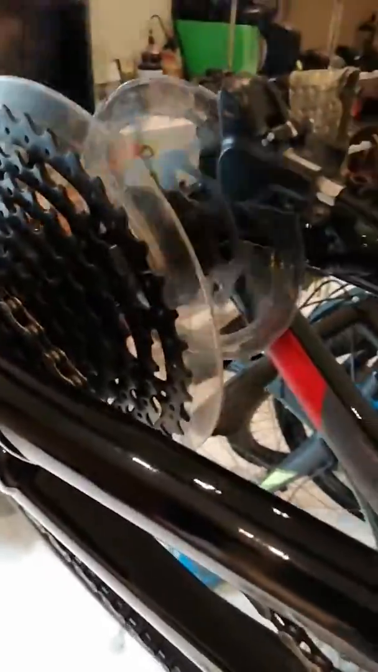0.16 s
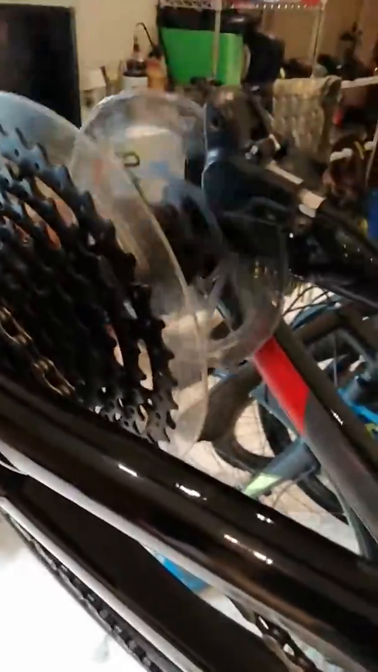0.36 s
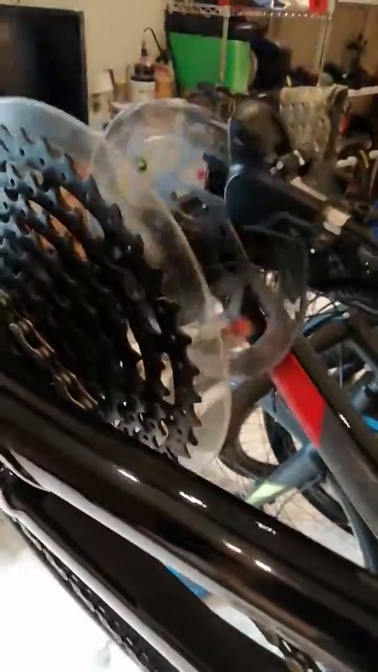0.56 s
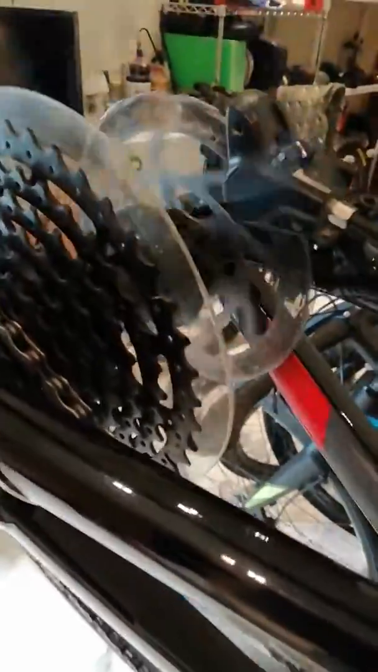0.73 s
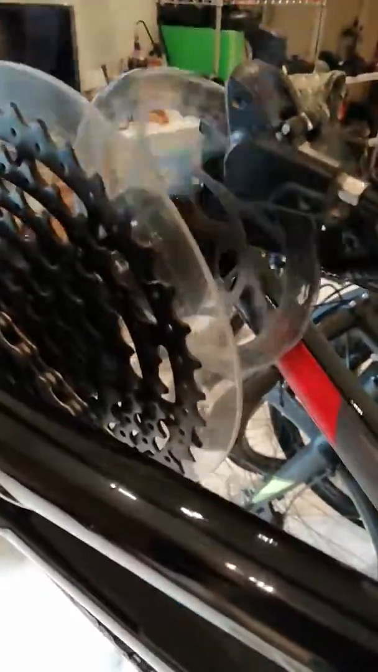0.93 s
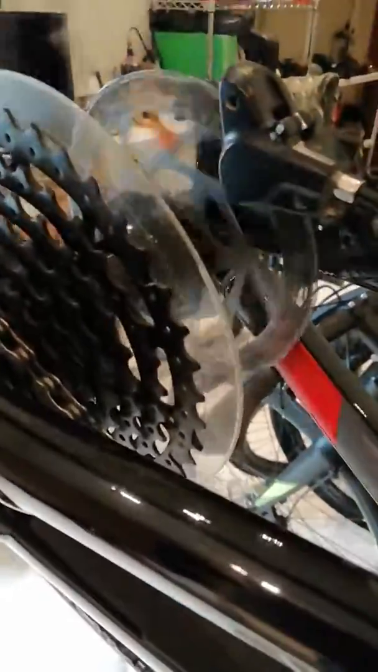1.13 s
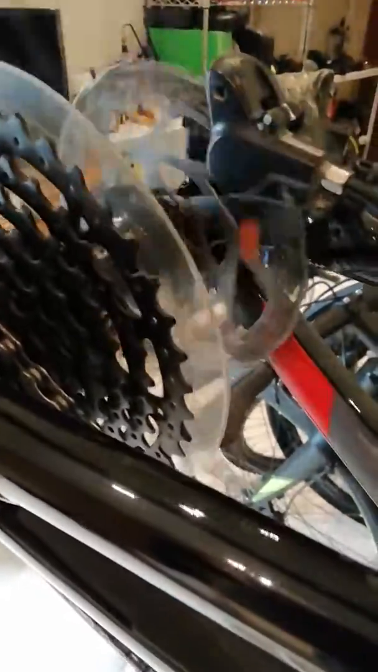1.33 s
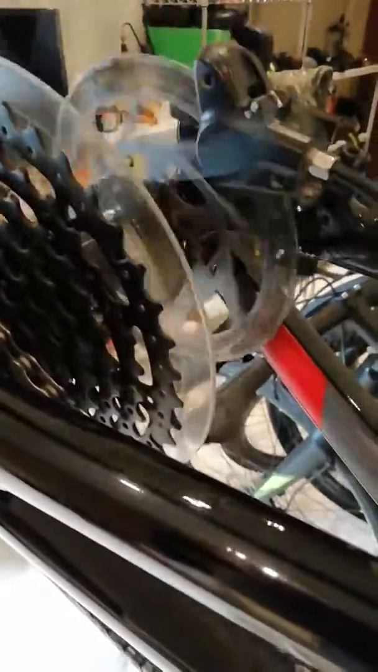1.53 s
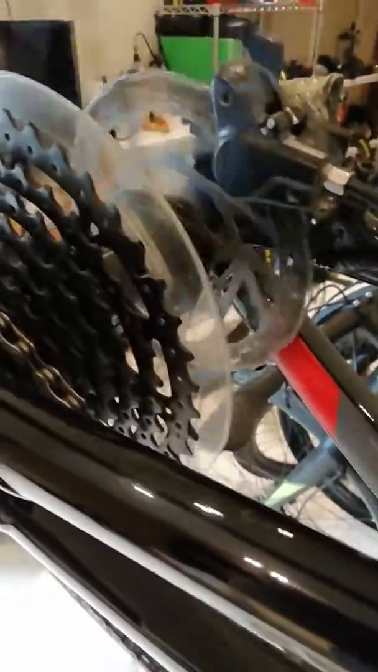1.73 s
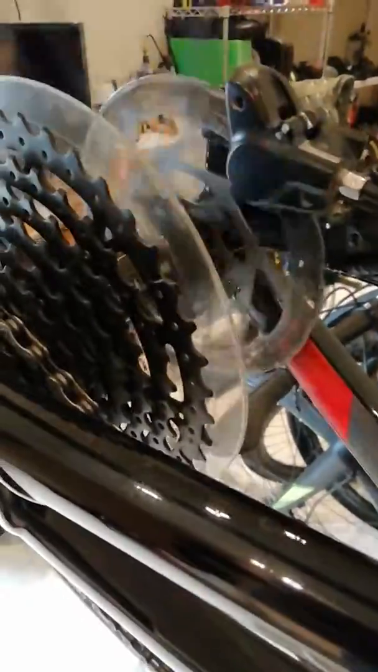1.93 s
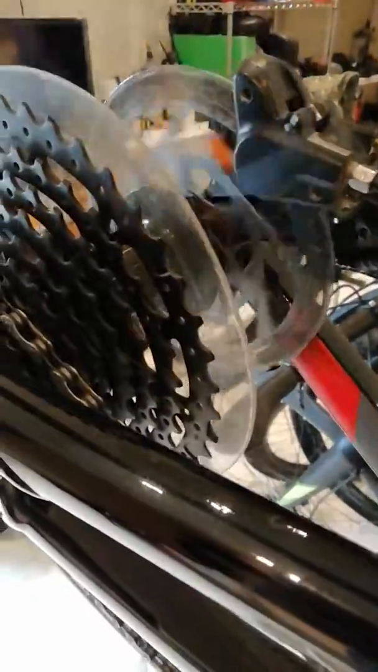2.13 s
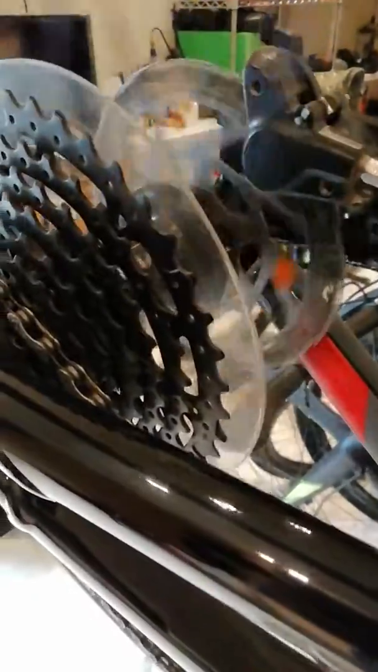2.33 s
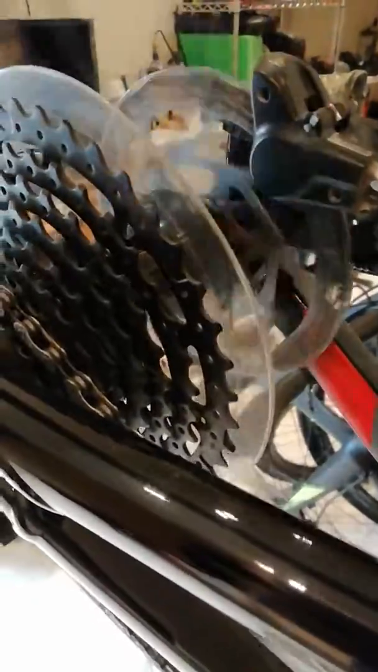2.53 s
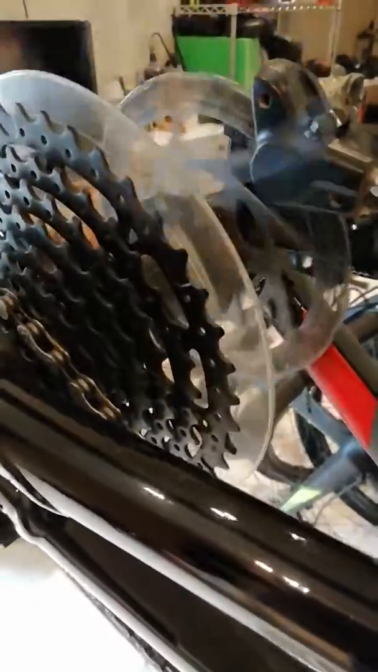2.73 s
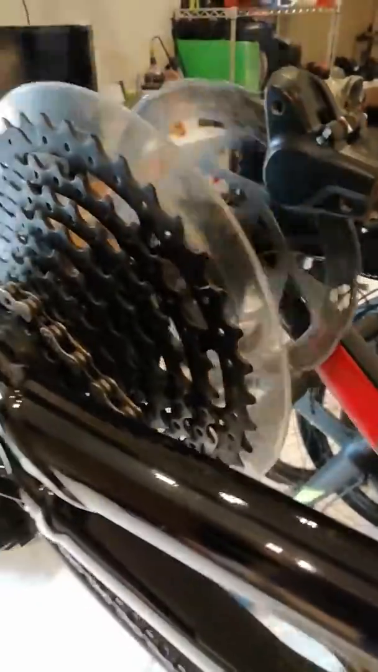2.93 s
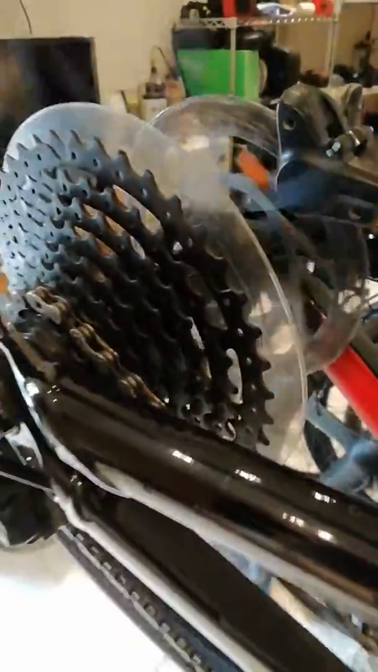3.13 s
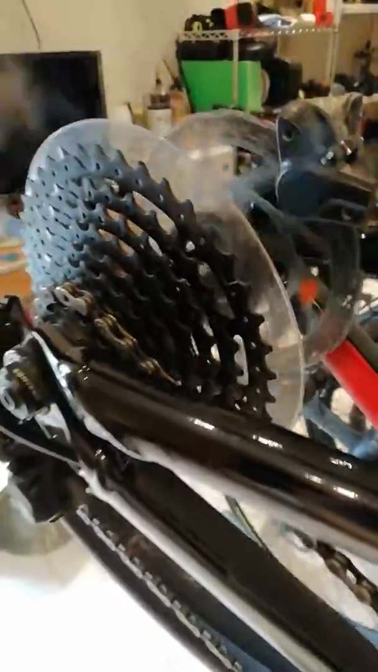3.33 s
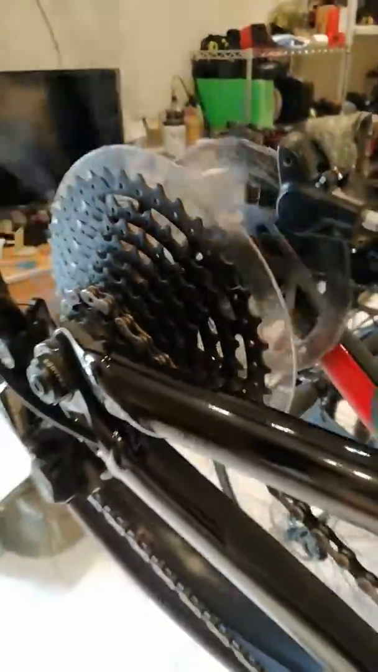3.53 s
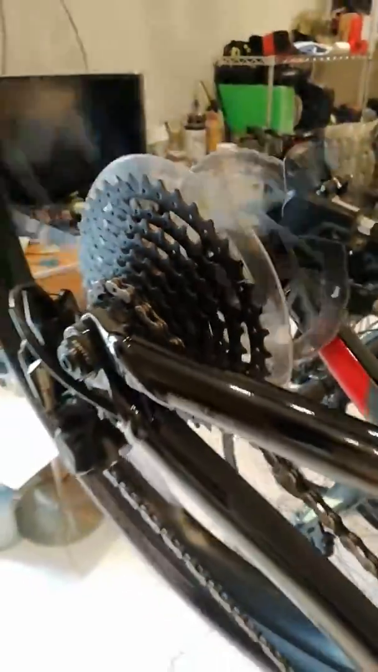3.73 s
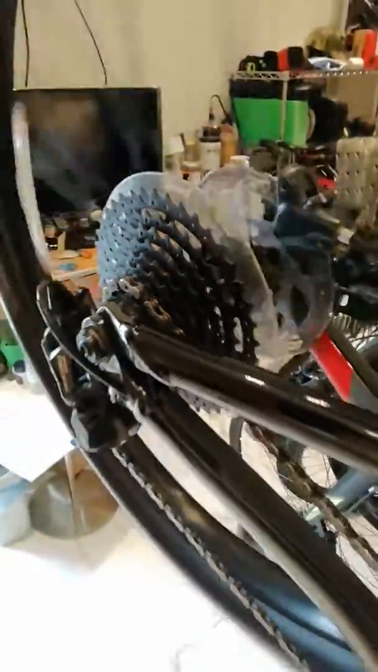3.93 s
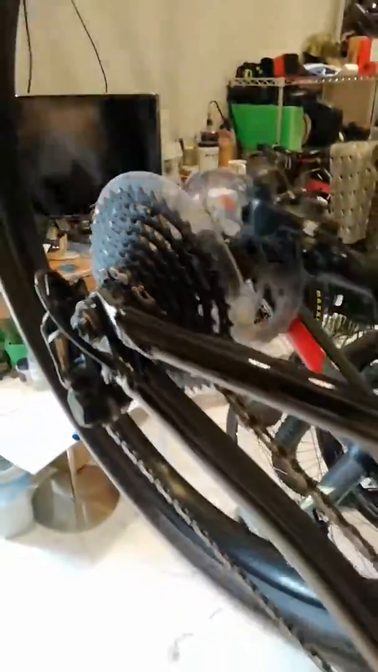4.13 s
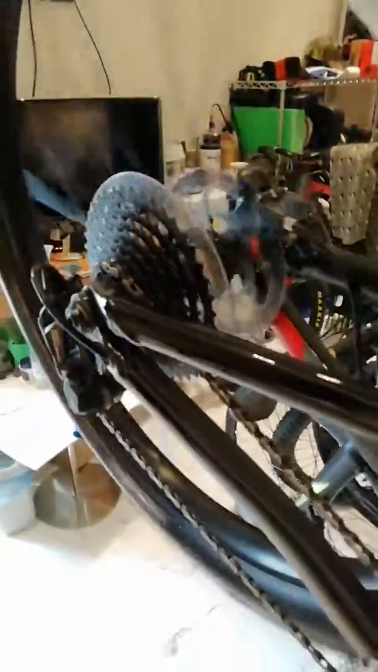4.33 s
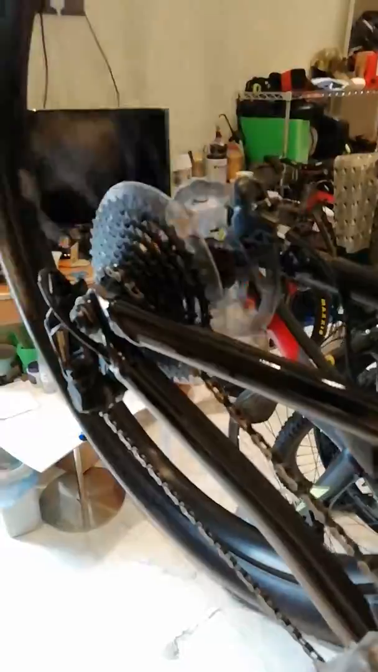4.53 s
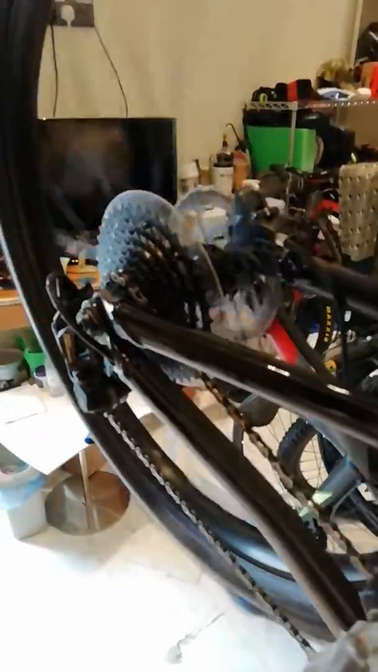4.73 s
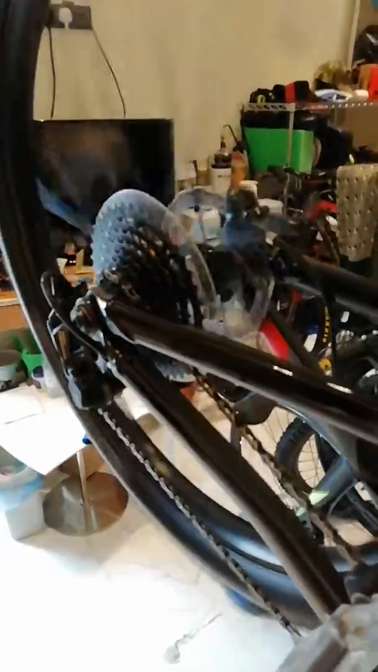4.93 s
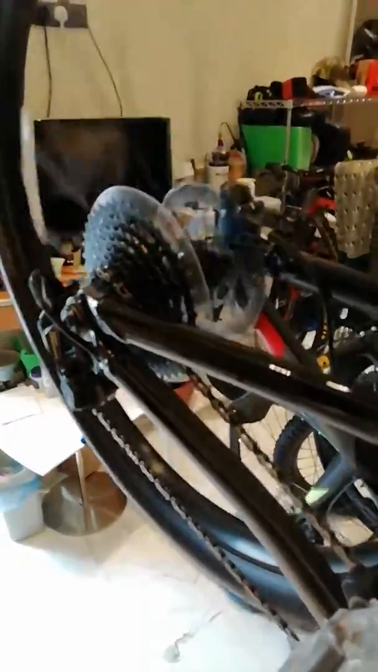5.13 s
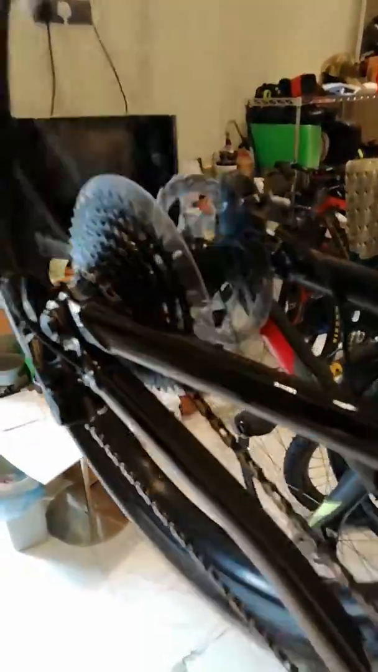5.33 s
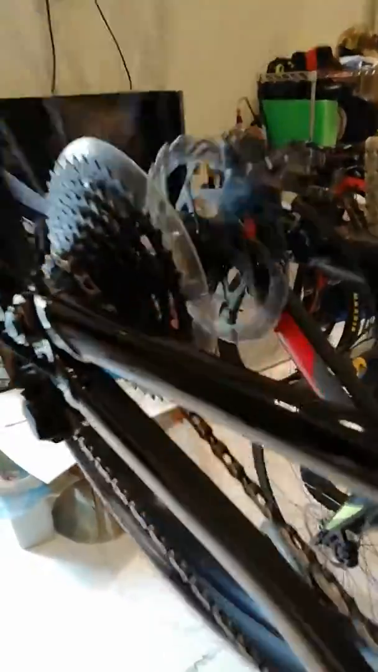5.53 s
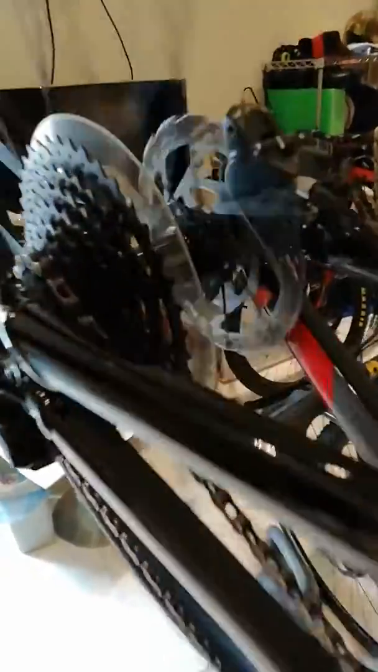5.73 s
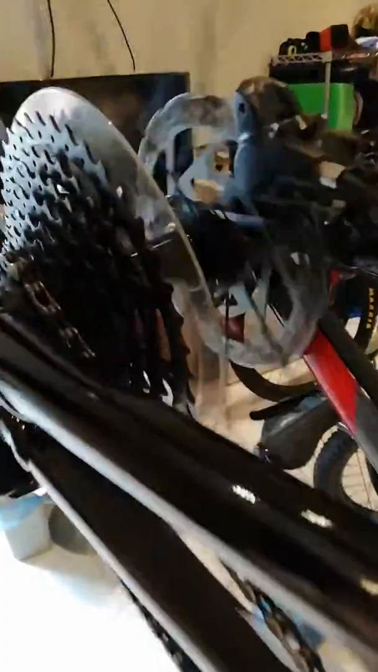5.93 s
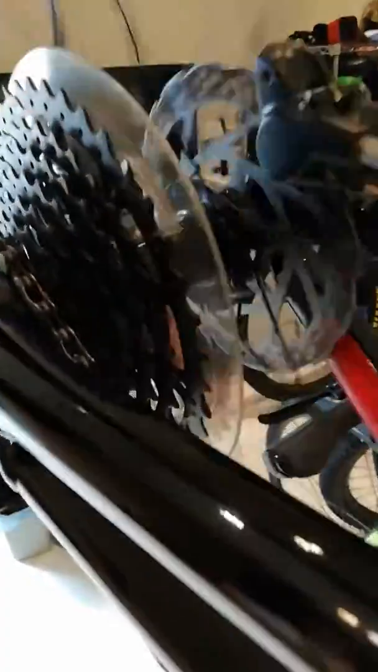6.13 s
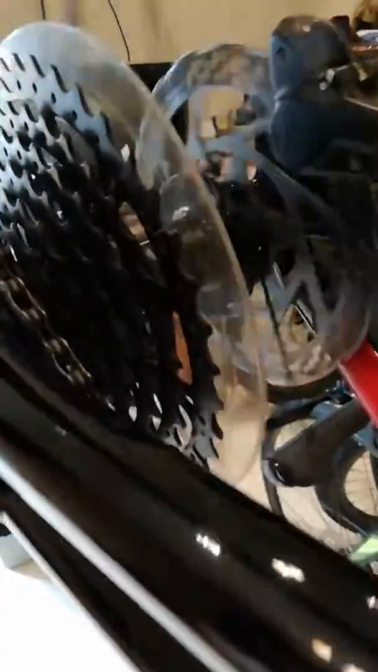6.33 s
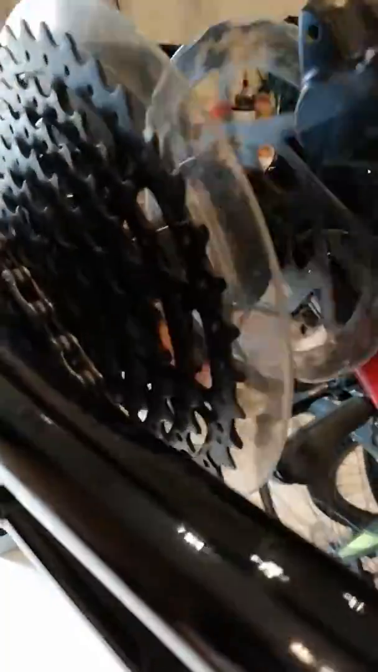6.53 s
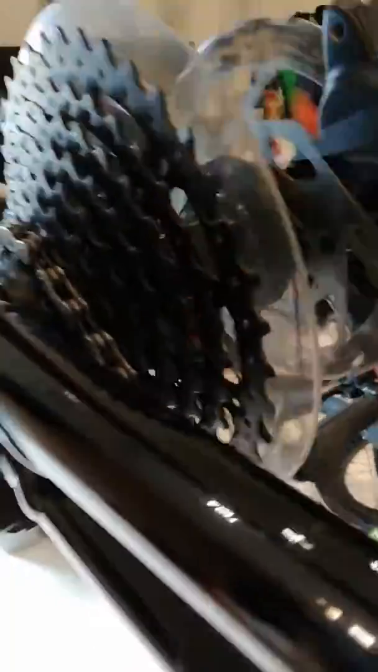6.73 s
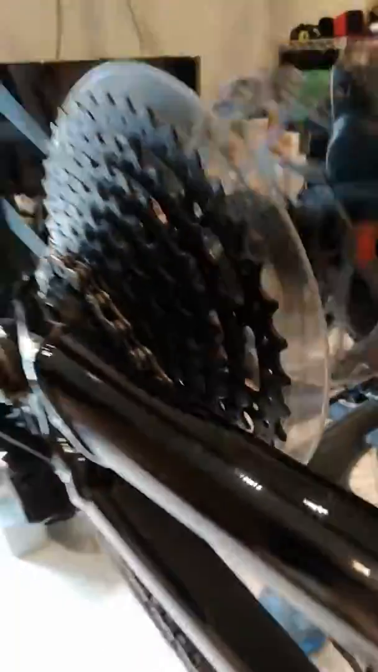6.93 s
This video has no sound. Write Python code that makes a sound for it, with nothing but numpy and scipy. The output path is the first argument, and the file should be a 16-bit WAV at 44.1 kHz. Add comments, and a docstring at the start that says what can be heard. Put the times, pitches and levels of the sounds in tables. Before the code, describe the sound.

Close to the hub of a coasting bicycle wheel, rapid ratchet clicks run together into a high metallic buzz, with a sharper snap about once a second. Midway the microphone moves away and the sound turns quieter and roomier. Near the end it returns, and the clicks are louder again but slower. The place is a small workshop with a faint background hum.

```python
"""In a small, faintly humming workshop, the microphone is close by the sprockets of a bicycle rear wheel
coasting down on a stand, slightly unbalanced. From the start three pawls drop in turn over the 32 ratchet
teeth, and hub, sprockets, spokes and brake disc ring along. Every fourth tooth rings out; from 0.2 s on,
once a turn, a pawl snaps in early. After 3 s the microphone draws back and the room stands out more.
Around 6 s it returns, nearer the disc, while the wheel ticks on more slowly."""
import sys
import numpy as np
from scipy import signal
from scipy.fft import rfft, irfft, next_fast_len
from scipy.io import wavfile
from scipy.ndimage import uniform_filter1d, minimum_filter1d

SR = 44100
rng = np.random.default_rng(int(sys.argv[2]) if len(sys.argv) > 2 else 0)


def wav_record(signal):
    """Record a signal, one row per channel, as 16-bit PCM in the file named by sys.argv[1]."""
    frames = np.transpose(np.atleast_2d(signal))
    bounded = np.clip(frames, -1, 1)
    # unit amplitude maps onto the largest positive 16-bit level
    quanta = np.round(bounded * 32767).astype(np.int16)
    wavfile.write(sys.argv[1], SR, quanta)


N = 307366
TIME = np.arange(N) / SR
AGE = np.arange(SR // 25) / SR  # time within one click [s]
TEETH_COUNT, WORN_TOOTH = 32, 9


def from_db(db):
    """Decibels to gain."""
    return 10 ** (np.asarray(db) / 20)


def unit_rms(x):
    """Scale to unit power."""
    return x / np.sqrt(np.mean(x ** 2) + 1e-20)


def hold_level(x):
    """Hold the power at 1 over a few teeth."""
    return x / np.sqrt(uniform_filter1d(np.mean(x ** 2, axis=0), size=SR // 8) + 1e-9)


def curve_at(rows, times):
    """The columns of a curve at the given times."""
    knots, *columns = np.transpose(rows)
    return [np.interp(times, knots, column) for column in columns]


def butter(x, order, hz, kind):
    """Causal Butterworth filter."""
    return signal.sosfilt(signal.butter(order, hz, kind, fs=SR, output="sos"), x)


def colour(x, points, keep_power=True):
    """Minimum-phase filter that follows a table of (frequency [Hz], gain [dB])."""
    size = 2 * next_fast_len(x.shape[-1] // 2 + SR // 20)
    hz, db = np.transpose(points)
    bins_hz = np.arange(size // 2 + 1) * SR / size
    gain = from_db(np.interp(np.log(bins_hz + 1), np.log(hz), db))
    cepstrum = irfft(np.log(unit_rms(gain) if keep_power else gain))[:size // 2]
    cepstrum[1:] *= 2
    return irfft(rfft(x, size) * np.exp(rfft(cepstrum, size)))[..., :x.shape[-1]]


def place(times, sounds):
    """Lay short stereo sounds (events, 2, samples) on the time line."""
    out = np.zeros((2, N + len(AGE)))
    for at, sound in zip(np.round(times * SR).astype(int), sounds):
        if 0 < at < N:
            out[:, at:at + len(AGE)] += sound
    return out[:, :N]


def resonate(x, modes, sign=1, lobe_s=0.97, order=1):
    """Modes beam, so each swells or dips as the microphone passes its lobe; the sum has unit power."""
    out = 0
    for k, (hz, width_hz, db, passing_s, lobe_db) in enumerate(modes):
        radius = np.exp(-np.pi * abs(width_hz) / SR)
        section = [0.95, 0.014, -0.97, 1, -2 * radius * np.cos(2 * np.pi * hz / SR), radius ** 2]
        rung = signal.sosfilt([section] * order, x + 1e-18)  # order 2 softens the onset
        lobe = np.exp(-.5 * ((TIME - passing_s) / lobe_s) ** 2)
        out = out + sign ** k * from_db(db + lobe_db * lobe) * unit_rms(rung)
    return unit_rms(out)


# spectrum of the workshop's background: (frequency [Hz], relative level [dB])
BACKGROUND_SPECTRUM = [(20, -4.5), (50, 2), (130, 3.5), (250, -3), (420, -5), (560, -9), (900, -11.5),
                       (3000, 5), (16000, -43)]
def background(apart_hz=260):
    """Quiet room rumble and hiss, alike at both sides of the microphone in the bass."""
    mid, side = rng.standard_normal((2, N))
    side = butter(side, 1, apart_hz, "high")
    return colour(mid + side * [[1], [-1]], BACKGROUND_SPECTRUM)


# the room's hum at the microphone: (time [s], level [dB])
ROOM_TONE_LEVEL = [(0, -63.5), (2.5, -66), (3.6, -62), (4.4, -59.5), (4.9, -67), (7, -77)]
def room_tone(hz=415):
    """A faint hum of steady pitch, a little later on the left."""
    tone = np.sin(2 * np.pi * hz * TIME - np.array([[1], [0]]))
    return from_db(curve_at(ROOM_TONE_LEVEL, TIME)[0]) * tone


# low wheel modes: (frequency [Hz], width [Hz], relative level [dB], lobe passed at [s], lobe gain [dB])
WHEEL_MODES = [(158, 10, -9, 5.5, 8), (410, 60, -4, 4.3, 0), (716, 14, -2, 5.8, 6), (907, 45, 2, 4.2, 4)]
# their sum at the microphone: (time [s], level [dB])
WHEEL_HUM_LEVEL = [(0, -55.5), (2, -57.5), (4.5, -59), (5.3, -60), (7, -67)]
def wheel_hum():
    """The wheel rings low and faint."""
    ringing = resonate(rng.standard_normal((2, N)), WHEEL_MODES)
    return from_db(curve_at(WHEEL_HUM_LEVEL, TIME)[0]) * ringing


def drops(pawl, start_speed=38.8096, friction=1.18473, drag_per_s=.038878):
    """Times and teeth of a pawl's drops as bearing friction [teeth/s^2] and air drag slow the wheel."""
    friction_speed = friction / drag_per_s
    speed = (start_speed + friction_speed) * np.exp(-drag_per_s * TIME) - friction_speed  # [teeth/s]
    turned = np.cumsum(speed) / SR - .342  # all angles in teeth
    # the heavy spot makes the wheel run ahead, then behind, once a turn, and more so as it slows
    sway = .0346 * (29.5 / speed) ** 2 * np.cos(2 * np.pi * (turned + .54) / TEETH_COUNT)
    lead = [.1261 + .004757 * speed, 0, .0012 * speed - .156][pawl]  # ahead of the second pawl
    angle = turned - sway + lead
    passed = np.arange(int(angle[-1]) + 1)
    if pawl == 1:  # on the worn tooth the second pawl snaps instead
        passed = passed[passed % TEETH_COUNT != WORN_TOOTH]
    tooth = passed % TEETH_COUNT
    worn_lag = .06 * (pawl == 2) * (tooth == WORN_TOOTH)
    return np.interp(passed + worn_lag, angle, TIME), tooth


# the cut repeats every fourth tooth; for a pawl that feels it fully: (click gain [dB], treble gain [dB])
TOOTH_CUT = [(-3, 0), (-0.3, -1), (0.3, 0.5), (1.8, 0)]
def drop_strength(pawl, tooth, swing_db=.13, hardest_tooth=23, wear_db=.34):
    """Force and treble of each drop in dB; both follow the cut, the force also the turn and the wear."""
    swing = swing_db * np.cos(2 * np.pi * (tooth - hardest_tooth) / TEETH_COUNT)
    wear = wear_db * rng.standard_normal(TEETH_COUNT)[tooth]
    feels_cut = [.55, 1, .1][pawl]
    click_db, treble_db = feels_cut * np.array(TOOTH_CUT)[tooth % len(TOOTH_CUT)].T
    return click_db + swing - wear, treble_db


def stereo_noise(count, alike):
    """Short pairs of noise with a given left-right correlation."""
    mid, side = np.moveaxis(rng.standard_normal((count, 2, 1, len(AGE))), 1, 0)
    return (np.sqrt(1 + alike) * mid + np.sqrt(1 - alike) * side * [[1], [-1]]) / np.sqrt(2)


def crack(tooth, rise_s, fall_s, body_db, body_s, cut_share=.55, low_hz=7500, high_hz=10000):
    """Steel on steel: a burst of hub modes, then a weaker ring; a tooth sounds alike on every turn."""
    by_cut = stereo_noise(len(TOOTH_CUT), alike=.45)[tooth % len(TOOTH_CUT)]
    by_tooth = stereo_noise(TEETH_COUNT, alike=.45)[tooth]
    signature = np.sqrt(cut_share) * by_cut + np.sqrt(1 - cut_share) * by_tooth
    repeats = .92 * np.exp(-AGE / .005)
    grain = np.sqrt(repeats) * signature + np.sqrt(1 - repeats) * stereo_noise(len(tooth), alike=.21)
    grain[:, 0] = np.roll(grain[:, 0], round(.00026 * SR), axis=-1)  # later on the left
    envelope = (1 - np.exp(-AGE / rise_s)) * (np.exp(-AGE / fall_s) + from_db(body_db) * np.exp(-AGE / body_s))
    burst = grain * envelope
    # every click starts out equally strong in its bright band
    band_power = np.mean(butter(burst, 2, [low_hz, high_hz], "band") ** 2, axis=2, keepdims=True)
    target_power = np.mean(envelope ** 2) * 2 * (high_hz - low_hz) / SR
    return burst * np.sqrt(target_power / band_power)


# the hub shell's note that beams towards the microphone: (time [s], pitch [Hz])
SHELL_NOTE = [(0.0, 8500), (0.74, 9240), (1.34, 8600), (3.13, 8330), (3.28, 7950), (4.23, 8570),
              (4.29, 8260), (4.54, 9000), (5.16, 8160), (5.26, 9000), (5.3, 8340), (5.82, 8250),
              (6.02, 8820), (6.97, 8400)]
def shell_pitch(pawl, times, shifts_hz=(-100, -50, 550)):
    """Each pawl rings the hub shell a little off its note."""
    return curve_at(SHELL_NOTE, times)[0] + shifts_hz[pawl]


def shell_ring(sounds, hz, width_hz=1300, ring_db=-2):
    """Each click rings on briefly in the hub shell."""
    radius = np.exp(-np.pi * width_hz / SR)
    rung = [signal.lfilter([1, 0, -1], [1, -2 * radius * cosine, radius ** 2], sound)
            for sound, cosine in zip(sounds, np.cos(2 * np.pi * hz / SR))]
    return sounds + from_db(ring_db) * (1 - radius ** 2) / 2 * np.array(rung)


def beam_treble(sounds, treble_db, edge_hz=10500, decay_s=.051, scatter_db=2.5):
    """The top of each click dies first; it beams, and is lost off the axis."""
    highpass = signal.butter(3, edge_hz, "high", fs=SR, output="sos")
    top = signal.sosfiltfilt(highpass, sounds, padtype=None)
    gain = from_db(treble_db + scatter_db * rng.standard_normal(len(sounds)))[:, None, None]
    return sounds + top * (gain * np.exp(-AGE / decay_s) - 1)


# one mode a pawl: (frequency [Hz], width [Hz], level re clicks [dB], lobe passed at [s], lobe gain [dB])
PAWL_MODES = [(6710, 100, -15, 5.3, -22), (9290, 120, -21.5, 3.9, -3), (9160, 400, -13.5, 4.1, 11)]
def pawl_ring(clicks, pawl):
    """Each pawl colours its clicks with a note of its own."""
    mode = PAWL_MODES[pawl]
    return clicks + from_db(mode[2]) * clicks.std() * resonate(clicks, [mode], lobe_s=.083)


# clicks fade as the microphone draws back and recover as it returns; the light pings swell and fade
# on their own: (time [s], click gain [dB], ping gain [dB])
HUB_LEVELS = [(0, -9, -25), (1.1, -8, -14), (3.1, -11, -18), (3.9, -18, -5.5), (4.55, -25, -18),
              (5.2, -19.5, -15), (5.9, -12, -7), (6.6, -7, -39), (7, -14, -21)]
# how the pawls carry from their seats in the hub: (time [s], first [dB], second [dB], third [dB])
PAWL_CARRY = [(0, -3.5, -3.5, -1), (1.5, -3.5, 1, -3.5), (3, -1, -0.5, 1.5), (4.5, 4.5, 1, 11),
              (5.8, -2, 0, 1), (6.5, -10.5, -2, 0), (7, -2, 6.5, -7)]
# click treble beamed at the microphone: (time [s], gain [dB])
TREBLE_BEAM = [(0, -3.5), (1.5, -7), (3, -4), (3.8, -6), (4.5, -8), (5.3, -8), (5.9, -7), (6.4, -5),
               (7, -8)]
def pawl_clicks(pawl, level_db=-1.5, scatter_db=.7):
    """One pawl's clicks, and the bare, slightly uneven pushes that it gives the axle."""
    times, tooth = drops(pawl)
    force_db, cut_treble_db = drop_strength(pawl, tooth)
    force_db = force_db + scatter_db * rng.standard_normal(len(times))
    click_db = level_db + curve_at(HUB_LEVELS, times)[0] + curve_at(PAWL_CARRY, times)[pawl] + force_db
    treble_db = curve_at(TREBLE_BEAM, times)[0] + [8.5, 7, 1.5][pawl] + cut_treble_db
    sounds = crack(tooth, rise_s=.00028, fall_s=.00088, body_db=-9.5, body_s=.0061)
    sounds = beam_treble(shell_ring(sounds, shell_pitch(pawl, times)), treble_db)
    clicks = place(times, sounds * from_db(click_db)[:, None, None])
    late_s = rng.uniform(0, .0008, len(times))
    push_db = [-2, 2, -5.5][pawl] + .3 * force_db  # only part of the extra force reaches the axle
    pushes = place(times + late_s, from_db(push_db)[:, None, None] * (AGE == 0))
    return pawl_ring(clicks, pawl), pushes


def ping(times, db, hz, swell_s, left_lag_s=.00025):
    """The hub shell swells into a short high note."""
    age = np.maximum(AGE - np.array([[left_lag_s], [0]]) + left_lag_s / 2, 0)
    swell = (age / swell_s * np.exp(1 - age / swell_s)) ** 2
    return place(times, from_db(db)[:, None, None] * swell * np.sin(2 * np.pi * hz[:, None, None] * age))


# each pawl's ordinary ping: (swell [s], relative level [dB], pitch spread [Hz])
LIGHT_PINGS = [(.0006, -9, 600), (.0009, -5, 400), (.0006, -7, 650)]
def pawl_pings(pawl, scatter_db=1.2):
    """The light pings of one pawl's drops, left out where a square hit falls."""
    swell_s, level_db, spread_hz = LIGHT_PINGS[pawl]
    times, tooth = drops(pawl)
    scatter, detune = rng.standard_normal((TEETH_COUNT, 2))[tooth].T
    db = level_db + curve_at(HUB_LEVELS, times)[1] + drop_strength(pawl, tooth)[0] + scatter_db * scatter
    hz = shell_pitch(pawl, times) + spread_hz * detune
    light = np.abs(times[:, None] - np.array(SQUARE_HITS)[:, 0]).min(axis=1) >= .002
    return ping(times[light], db[light], hz[light], swell_s)


# modes of frame, sprockets and brake disc, whose lobes the microphone passes:
# (frequency [Hz], width [Hz], relative level [dB], lobe passed at [s], lobe gain [dB])
FRAME_MODES = [(1095, 60, 0.5, 5.0, -11), (1162, 55, 0, 5.0, 0.5), (1222, 55, -4, 5.3, 3),
               (1335, 60, -10, 4.35, 13.5), (1542, 70, -7, 0.4, 6), (1660, 130, -7, 3.6, 7),
               (1750, 120, -4, 5.5, 14), (2060, 110, -2.5, 4.8, -8), (2180, 110, -10, 5.4, 13),
               (2310, 130, -6, 6.2, -6)]
SPROCKET_MODES = [(3200, 450, -9, 6.3, -16), (4535, 50, 4.5, 5.9, 3), (4860, 45, 2, 2.3, 3),
                  (5297, 45, 0.5, 3.8, 3), (5420, 200, -12, 5.63, 21), (5500, 240, -10, 4.1, 17),
                  (5852, 45, -5, 3.7, 3), (6477, 65, -5, 6.3, -5), (7450, 220, 0, 6.5, -5),
                  (7880, 220, 1, 3.7, 5), (8880, 130, 1, 4.2, 5)]
DISC_MODES = [(3775, 200, 1.5, 5.7, 7), (4060, 200, -2, 6.4, 3), (4510, 220, 3, 6.6, 7)]
# ringing towards the microphone: (time [s], frame level [dB], sprocket level [dB])
RINGING_LEVEL = [(0, -37, -33), (.5, -34.5, -27), (1.1, -37.5, -29), (3.1, -38.5, -29), (3.28, -36, -25.5),
                 (3.45, -35.5, -30), (3.8, -37, -30), (4.2, -36, -31.5), (4.7, -38, -35),
                 (5.35, -34.5, -35.5), (5.6, -36, -30.5), (5.9, -40.5, -32.5), (7, -42, -29.5)]
# how openly the disc rings towards the microphone: (time [s], gain [dB])
DISC_OPENNESS = [(0, -7.5), (1.5, -2), (3.3, -2), (3.7, -6.5), (4.2, -27), (5.3, -20.5), (5.7, 0.5),
                 (6.1, -3), (6.4, 6.5), (7, 6)]
def ringing_parts(pushes, clicks, disc_db=-34, frame_room_db=-9, left_lag_s=.0008):
    """Pushes and clicks travel through the axle into frame, sprockets and brake disc."""
    frame_db, sprocket_db = curve_at(RINGING_LEVEL, TIME)
    pushes, clicks = unit_rms(pushes), unit_rms(clicks)
    frame = resonate(pushes + .29 * clicks, FRAME_MODES, sign=-1, lobe_s=.33)
    frame = butter(frame, 6, 1000, "high")
    frame = from_db(frame_db) * hold_level(frame + from_db(frame_room_db) * workshop(frame))
    sprockets = from_db(sprocket_db) * hold_level(resonate(pushes + clicks, SPROCKET_MODES, lobe_s=.11))
    disc = resonate(pushes + .96 * clicks, DISC_MODES, sign=-1, order=2)
    disc = from_db(disc_db + curve_at(DISC_OPENNESS, TIME)[0]) * hold_level(disc)
    left, right = frame + sprockets + disc
    return np.array([np.interp(TIME - left_lag_s, TIME, left), right])


# colour of the workshop's reflections: (frequency [Hz], gain [dB])
ROOM_COLOUR = [(400, -4), (1100, 8.5), (2200, 3), (3000, 5.5), (4000, 7.5), (8500, -4), (11000, -5),
               (16000, -5)]
def workshop(x, t60_s=.21, build_s=.00083, spots=4):
    """Dense reflections from floor, shelves and walls; their pattern shifts as the microphone moves."""
    age, out = TIME[:SR // 3], 0
    envelope = from_db(-60 * age / t60_s) * (1 - np.exp(-(age / build_s) ** 2))
    for spot in range(spots):
        tail = rng.standard_normal((2, len(age))) * envelope
        tail /= np.sqrt(np.sum(tail ** 2, axis=1, keepdims=True))
        away_s = (TIME - spot + spots / 2) % spots - spots / 2  # a spot gives way to the next each second
        fade = np.cos(np.pi / 2 * np.minimum(abs(away_s), 1))
        out = out + signal.oaconvolve(x, tail, axes=1)[:, :N] * fade
    return colour(out, ROOM_COLOUR, keep_power=False)


# the second pawl on every fourth tooth and, once the wheel is slow, the other pawls too:
# (time [s], relative peak [dB], pitch [Hz])
SQUARE_HITS = [(0.0864, -4.6, 8800), (0.1903, -4.2, 8700), (0.2949, -5.8, 8650), (0.3999, -6.8, 8290),
               (0.5065, -5.2, 8580), (0.6139, -5.1, 8800), (0.7226, -3.0, 8700), (0.8318, -3.6, 8600),
               (0.9413, -3.4, 8560), (1.0514, -2.6, 8530), (1.1626, -3.5, 8530), (1.2744, -4.1, 8370),
               (1.3884, -3.7, 8510), (1.5029, -3.0, 8540), (1.6185, -3.1, 8500), (1.7351, -3.8, 8490),
               (1.8518, -3.4, 8490), (1.9694, -2.6, 8450), (2.0884, -3.6, 8500), (2.208, -3.3, 8350),
               (2.3297, -3.1, 8460), (2.4526, -3.0, 8590), (2.5768, -3.1, 8490), (2.7023, -3.1, 8510),
               (2.8278, -3.6, 8500), (2.9544, -3.3, 8520), (3.0819, -4.5, 8340), (3.211, -6.1, 8280),
               (3.3425, -5.0, 8170), (3.4756, -7.0, 8460), (3.6103, -6.6, 8530), (3.7462, -6.4, 8300),
               (4.02, -6.5, 8340), (4.1591, -9.6, 8160), (4.2996, -9.3, 8200), (4.4427, -7.7, 8310),
               (4.5882, -11.4, 8300), (4.7357, -10.7, 8250), (4.8849, -9.9, 8400), (5.6512, -6.4, 8120),
               (5.8035, -9.5, 8450), (5.8123, -10.5, 8040), (5.982, -7.5, 9600), (6.0235, -8.5, 9550),
               (6.0495, -11, 8900), (6.0655, -9, 9450), (6.1075, -10.5, 9400), (6.133, -11, 8800),
               (6.1426, -11.5, 8600), (6.191, -12, 9350), (6.2325, -11, 9400), (6.3005, -11.5, 8700),
               (6.3098, -9.5, 8510), (6.3155, -10, 8800), (6.4779, -9.4, 9140)]
def square_hits(level_db=.5):
    """Pawls that land squarely ring out and give the buzz its steady beat."""
    times, peak_db, hz = np.transpose(SQUARE_HITS)
    return ping(times, peak_db + level_db, hz, swell_s=.0009)


# once a turn, at the worn tooth: (time [s], relative crack level [dB], relative thump level [dB])
WORN_TOOTH_SNAPS = [(0.2313, -10, -42.5), (1.0953, 2, -53), (2.0162, 3, -50), (3.0058, -2, -52),
                    (4.0772, -1.5, -56), (5.248, 2, -59), (6.5487, 3, -48)]
def snaps(level_db=-2, treble_db=7, thump_db=11, thump_s=.0013):
    """A harder, brighter crack as the pawl snaps early; the microphone gives a faint low thump with each."""
    times, crack_db, low_db = np.transpose(WORN_TOOTH_SNAPS)
    cracks = crack(np.zeros(len(times), int), rise_s=.00064, fall_s=.00074, body_db=-36, body_s=.0017)
    cracks = beam_treble(cracks, treble_db) * from_db(crack_db + level_db)[:, None, None]
    pulse = AGE / thump_s * np.exp(1 - AGE / thump_s) * np.ones((2, 1))
    mic_thumps = from_db(low_db + thump_db)[:, None, None] * pulse
    return place(times + .00044, cracks), place(times, mic_thumps)


# the band near 3 kHz, which fades off its axis: (time [s], gain [dB])
MIDDLE_BEAM = [(0, 3.5), (.9, -1), (1.6, 1.5), (3.3, 1.5), (4.1, -2.5), (5.3, -3.5), (5.9, -2), (6.5, -9),
               (7, 0)]
# stereo balance at the microphone: (frequency [Hz], left minus right [dB])
SIDE_BALANCE = [(500, 11.5), (1140, -2), (1650, -10), (2400, -3.5), (3440, -11), (4970, 2), (7200, 2),
                (10400, 0.5), (15000, -4.5)]
def radiate(x, middle_hz=(2450, 3450), gap_hz=4280, gap_q=32):
    """The wheel hardly radiates in one narrow gap; its middle comes and goes; bands lean left or right."""
    middle = butter(x, 1, middle_hz, "band")
    beamed = x + (from_db(curve_at(MIDDLE_BEAM, TIME)[0]) - 1) * middle
    notched = signal.lfilter(*signal.iirnotch(gap_hz, gap_q, fs=SR), beamed)
    return np.array([colour(channel, np.array(SIDE_BALANCE) * [1, share], keep_power=False)
                     for channel, share in zip(notched, (.5, -.5))])


# colour of the clicks by the hub: (frequency [Hz], relative level [dB])
CLICK_SPECTRUM = [(500, -38), (990, -27.5), (1110, -22), (2000, -11.5), (3000, -21), (4200, -12.5),
                  (5800, -7), (7000, -7), (7700, -0.5), (8500, 0), (9400, -3.5), (10500, -5.5),
                  (11700, -16.5), (14200, -9.5), (16000, -23)]
# where the hub lies before the microphone: (time [s], lean to the left [dB, before centring and scaling])
HUB_BEARING = [(0.0, 3.5), (1.55, 3.5), (3.2, 5), (4.15, 0.5), (5.2, 4), (5.7, 1.5), (6.17, 0), (6.97, 3.5)]
def scene(background_db=-48.5, pan_scale=.56, close_room_db=-6, close_click_db=-8):
    """Clicks and pings at the hub, the parts that they set ringing, and the workshop around them."""
    snap, mic_thumps = snaps()
    clicks, pushes = np.sum([pawl_clicks(pawl) for pawl in range(3)], axis=0)
    clicks += snap
    hub = colour(clicks, CLICK_SPECTRUM) + square_hits() + sum(pawl_pings(pawl) for pawl in range(3))
    # the room fades less with distance than the hub does
    away_db = close_click_db - curve_at(HUB_LEVELS, TIME)[0]
    room = workshop(hub * from_db(close_room_db + .54 * away_db))
    lean = curve_at(HUB_BEARING, TIME)[0]
    direct = hub * from_db(pan_scale * (lean - lean.mean()) * [[1], [-1]])
    wheel = radiate(direct + room + ringing_parts(pushes, clicks))
    return wheel + mic_thumps + wheel_hum() + room_tone() + from_db(background_db) * background()


def record(dry, cutoff_hz=15900):
    """Behind the microphone a fast limiter holds the highest peaks at full scale; the top is cut."""
    allowed = 1 / np.maximum(np.abs(dry).max(axis=0), 1)
    gain = uniform_filter1d(minimum_filter1d(allowed, size=129), size=129)
    return signal.sosfilt(signal.ellip(10, .1, 70, cutoff_hz, fs=SR, output="sos"), dry * gain)


dry = scene()
out = record(dry)
wav_record(out)
```